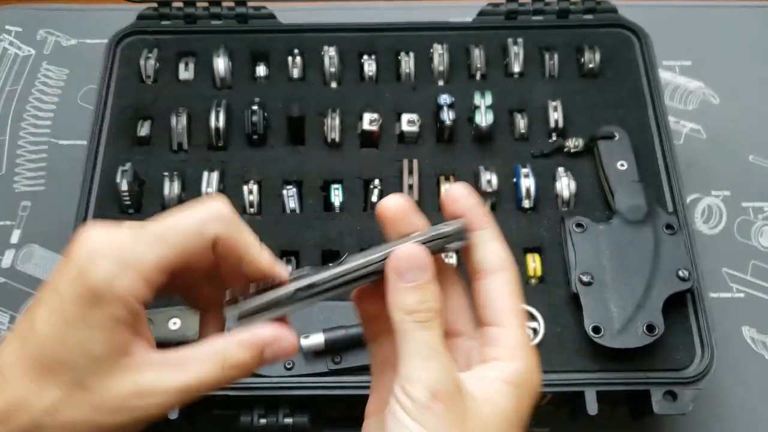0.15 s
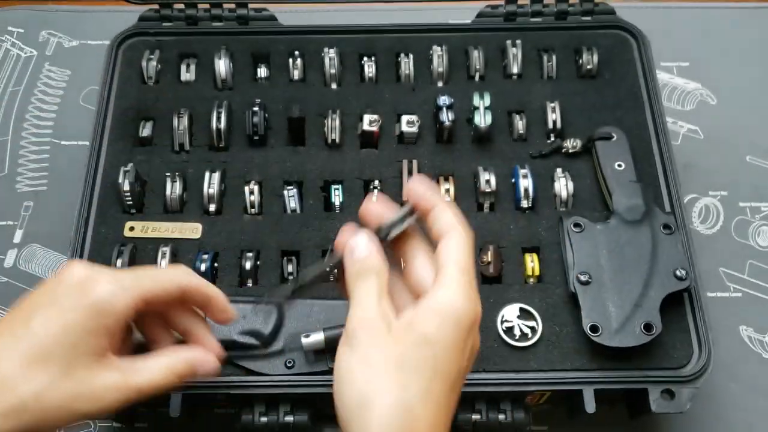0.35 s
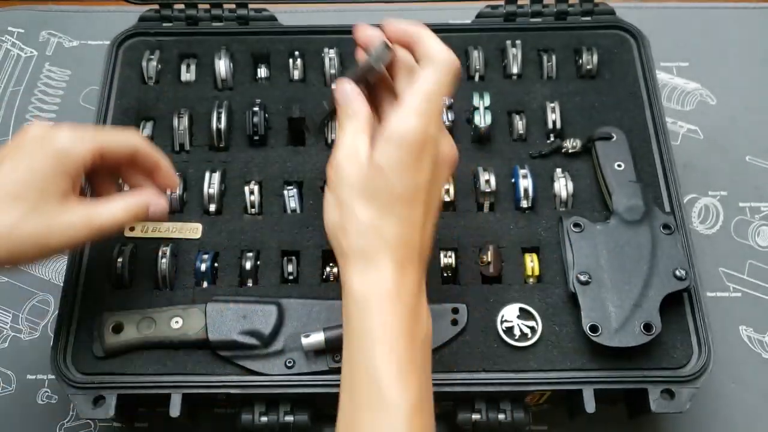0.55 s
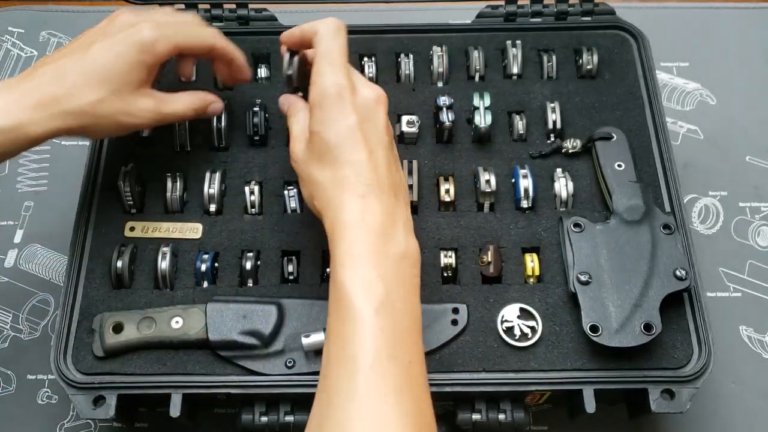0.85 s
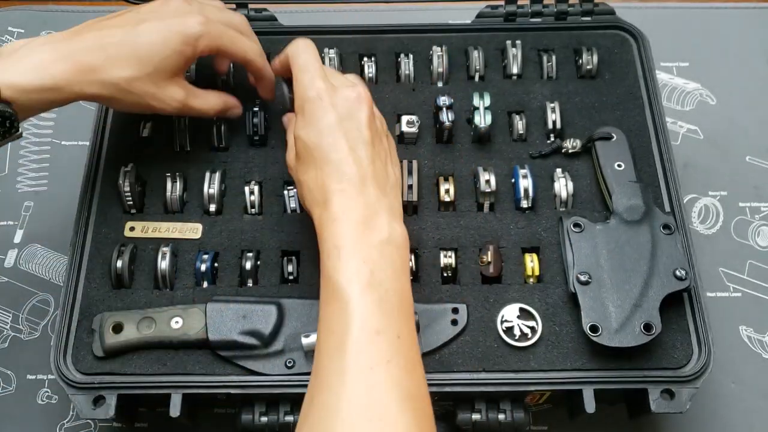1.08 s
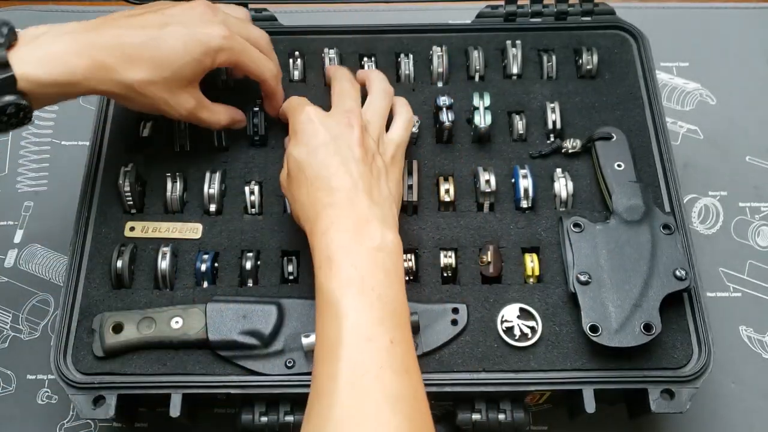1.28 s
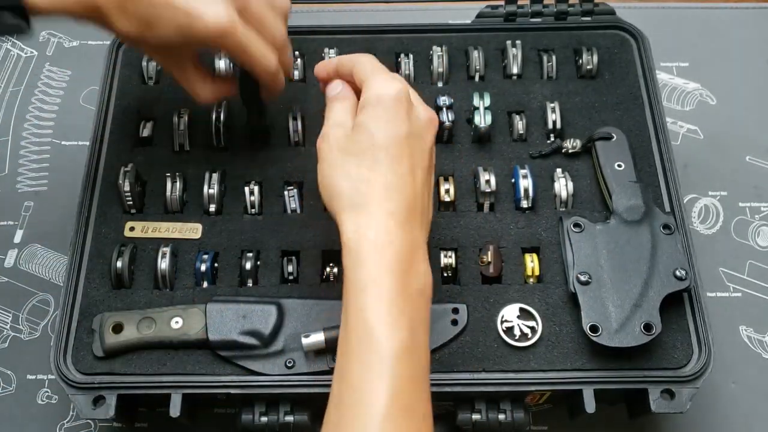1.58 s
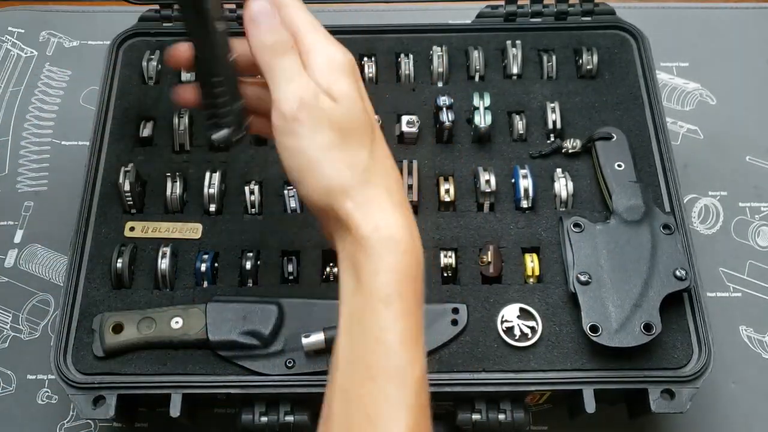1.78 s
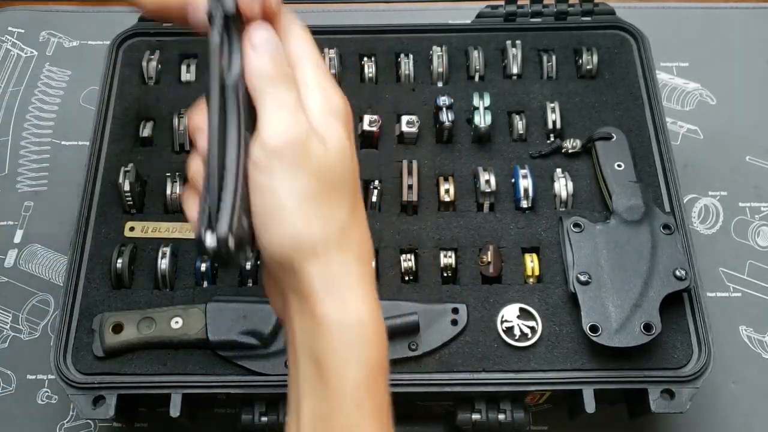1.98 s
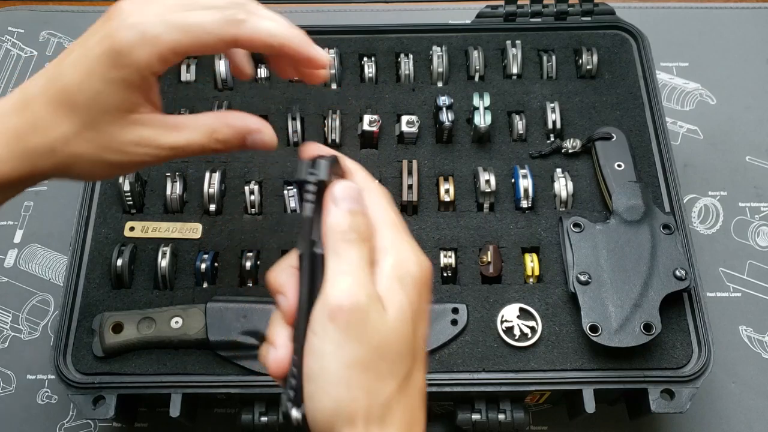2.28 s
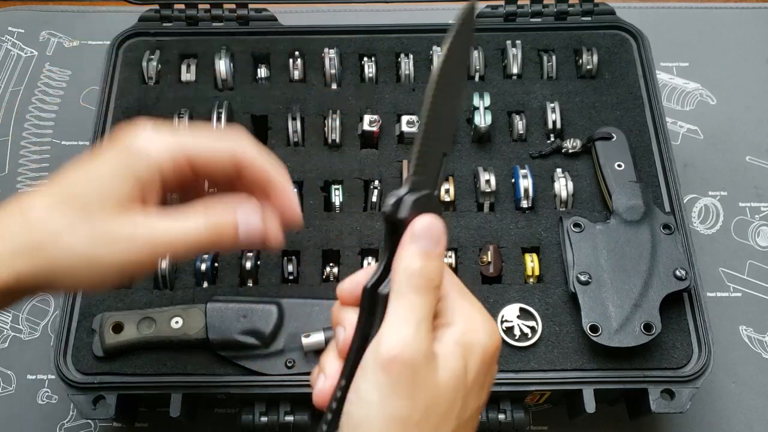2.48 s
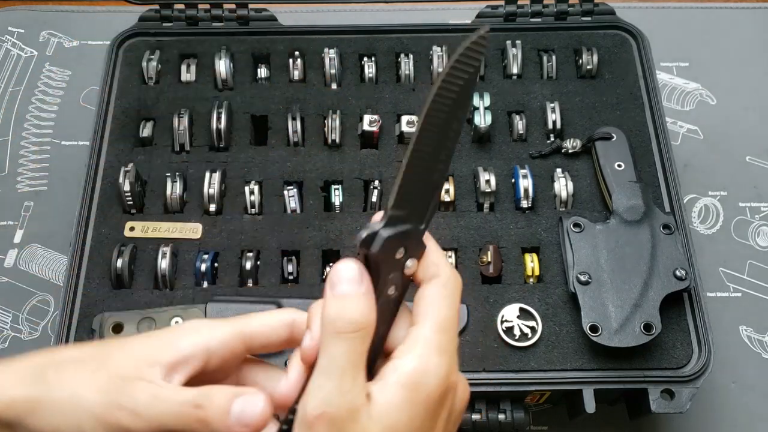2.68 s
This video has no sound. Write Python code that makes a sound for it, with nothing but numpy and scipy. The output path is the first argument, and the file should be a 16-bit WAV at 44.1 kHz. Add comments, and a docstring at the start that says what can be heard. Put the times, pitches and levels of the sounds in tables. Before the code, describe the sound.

Soft foam rustles and dull thumps, then a pocket knife flicks open with a hard steel snap

```python
"""In a quiet, small room, knives are moved in a foam-lined case close to two microphones.
One slides into the foam and thumps the case; another is drawn out, ticks, and its blade snaps open.
Steel is decaying modes under noise cracks, foam is random slips through resonances, rubbing is shaped noise.
A low hum wavers under the hiss of the microphones; the left one hisses in the mid band."""
import sys
import numpy as np
from scipy import signal
from scipy.fft import rfft, irfft
from scipy.io import wavfile
from scipy.ndimage import uniform_filter1d

SR = 44100
rng = np.random.default_rng(int(sys.argv[2]) if len(sys.argv) > 2 else 0)


def dump(signal):
    """Clip the signal to [-1, 1] and save it as 16-bit WAV at the path in sys.argv[1]."""
    limited = np.clip(np.atleast_2d(signal).T, -1, 1)
    pcm = np.round(limited * 32767).astype(np.int16)
    wavfile.write(sys.argv[1], SR, pcm)


N = 125685  # length in samples


def amp(db):
    """Decibel definition: amplitude ratio of a level."""
    return 10 ** (np.asarray(db) / 20)


def evened(x):
    """Normalisation: scales each channel to an RMS of 1."""
    return x / np.sqrt(np.mean(x ** 2, axis=-1, keepdims=True) + 1e-20)


def read(points, hz):
    """Logarithmic frequency scale: interpolates the columns of a table along it."""
    f, *cols = np.transpose(points)
    return np.array([np.interp(np.log(hz + 1), np.log(f + 1), c) for c in cols])


def level(rows, column=1):
    """Amplitude envelope: gain over time from a dB column, silent outside the table."""
    rows = np.array(rows)
    return amp(np.interp(np.arange(N) / SR, rows[:, 0], rows[:, column], left=-200, right=-200))


def add(mix, s, sound):
    """Superposition: adds a sound into the mix from time s."""
    part = mix[..., round(s * SR):][..., :sound.shape[-1]]
    part += sound[..., :part.shape[-1]]


def colour(x, points):
    """Linear filtering: multiplies the spectrum by a dB table."""
    gain = amp(read(points, np.fft.rfftfreq(x.shape[-1], 1 / SR)))
    return irfft(rfft(x) * gain, x.shape[-1])


def resonate(x, hz, width):
    """Resonance: shifts a fixed or moving centre to 0 Hz, smooths there and shifts back."""
    turn = np.exp(2j * np.pi * np.cumsum(hz * np.ones(len(x))) / SR)
    r = np.exp(-np.pi * width / SR)
    return 2 * (turn * signal.lfilter([1 - r], [1, -r], x / turn)).real


def resonate_twice(x, hz, width):
    """Cascaded resonance: two equal stages, evened, give steeper skirts."""
    return evened(resonate(resonate(x, hz, width), hz, width))


# blows of steel on steel: (time [s], starting level of the crack [dB], drive of the ring [dB])
STEEL_BLOWS = [(1.479, -51, -44.5), (1.4812, -47.5, -47), (1.4838, -59, -63), (2.252, -71, -64),
               (2.3859, -54.5, -52.5), (2.394, -62.5, -60), (2.4062, -46.5, -56.5), (2.4105, -60.5, -51.5),
               (2.4655, -8, -1.5), (2.4667, -10, -10), (2.4690, -13.5, -13), (2.4778, -24, -23.5)]
# modes of the knife: (frequency [Hz], relative level [dB], decay time t60 [s])
KNIFE_MODES = [(320, -34.5, 0.027), (545, -27, 0.048), (732, -26, 0.058), (1064, -29.5, 0.063),
               (1970, -25.5, 0.027), (2091, -14, .04), (2195, -18, .025), (3767, -15.5, 0.0077),
               (4630, -14.5, .006), (5880, 2.5, .006), (7110, -1, 0.011), (8930, -5, 0.018),
               (13700, -4, 0.0091), (15380, -9, 0.0045)]
# spectrum of the crack before evening: (frequency [Hz], relative level [dB])
CRACK_SPECTRUM = [(300, -18), (1400, -22), (2200, -7.5), (3200, -13.5), (5000, -3.5), (6500, 2.5),
                  (7900, -1), (9200, -3), (13000, -3.5), (16000, -8.5)]
CONTACT_S, CRACK_T60_S = .0002, 0.0078
GRIT_SAME = .6  # correlation of the crack between the microphones
RING_SEND_DB = -8  # the room hears less of the ring than of the crack
CRACK_ECHO_DB = 13  # energy of a crack as the walls receive it, relative to its level


def knife():
    """Modal impact: a ragged crack and decaying modes; returns direct sound and three feeds for the room."""
    t, direct, feeds = np.arange(4000) / SR, np.zeros((2, N)), np.zeros((3, N))
    grits = evened(colour(rng.standard_normal((len(STEEL_BLOWS), 2, 4000)), CRACK_SPECTRUM))
    grits = np.array([[1, 0], [GRIT_SAME, np.sqrt(1 - GRIT_SAME ** 2)]]) @ grits
    click = colour(np.eye(1, 200, 20)[0], CRACK_SPECTRUM)[0]
    click = click / np.linalg.norm(click)
    contact = 1 - np.exp(-t / CONTACT_S)
    for k, (s, crack_db, ring_db) in enumerate(STEEL_BLOWS):
        ring = np.zeros(len(t))
        for hz, mode_db, t60 in KNIFE_MODES:
            ring += amp(mode_db - 60 * t / t60) * np.sin(2 * np.pi * (hz * t + rng.random()))
        ring *= .5 * amp(ring_db) * contact
        crack = amp(crack_db - 60 * t / CRACK_T60_S) * grits[k] * contact
        add(direct, s, ring + crack)
        # successive blows take turns among the feeds
        add(feeds[k % 3], s, amp(RING_SEND_DB) * ring)
        add(feeds[k % 3], s, amp(crack_db + CRACK_ECHO_DB) * click)
    return direct, feeds


# colour of the direct path to each microphone: (frequency [Hz], left gain [dB], right gain [dB])
DIRECT_COLOUR = [(300, -8, -1), (1000, -10, -11.5), (2100, 2.5, -11.5), (3300, 1, -1), (4400, 1, 3.5),
                 (6690, -7, 5), (7870, 4, 4.5), (9350, 4, 3.5), (11000, -7, 3.5), (15320, 0.5, 0.5)]
RIGHT_LAG_S = .00007


def direct_path(steel):
    """Time-of-arrival difference: the right channel arrives later, and each path has its own colour."""
    lag = np.exp(-2j * np.pi * np.fft.rfftfreq(N, 1 / SR) * RIGHT_LAG_S)
    late = irfft(rfft(steel[1]) * lag, N)
    return colour(np.array([steel[0], late]), DIRECT_COLOUR)


# jolts of the case as the knife lands:
# (time [s], envelope peak level [dB], frequency [Hz], time to the envelope peak [s])
CASE_THUMPS = [(1.2485, -35, 86, 0.0093), (1.279, -44.5, 70, 0.0087), (1.313, -42, 87.7, 0.0115)]
# single catches of the foam:
# (time [s], envelope peak level [dB], frequency [Hz], time to the envelope peak [s])
FOAM_CATCHES = [(.972, -50, 288, 0.0087), (1.2008, -46.5, 380.5, 0.0036), (1.203, -61, 767, 0.0034),
                (1.228, -51, 404, 0.0054), (1.28, -53, 246, .004), (1.587, -52.5, 356, 0.0035),
                (1.601, -52.5, 296, 0.0092), (1.654, -45.5, 320, 0.0035), (1.673, -44.5, 304, 0.0039)]
# low jolt of the snap; levels are (left, right)
PUSH_S, PUSH_HZ, PUSH_SWELL_S, PUSH_DB = 2.4655, 72, 0.003, [-52, -33]


def thumps():
    """Transient excitation: the case booms, the foam catches, and the snap jolts the microphones."""
    out = np.zeros((2, N))
    for s, db, hz, swell in CASE_THUMPS + FOAM_CATCHES:
        add(out, s, bump(db, hz, swell))
    add(out, PUSH_S, bump(np.c_[PUSH_DB], PUSH_HZ, PUSH_SWELL_S))
    return out


def bump(db, hz, swell):
    """Critically damped envelope: a low sine swells and dies."""
    t = np.arange(8000) / SR
    return amp(db) * np.sin(2 * np.pi * hz * t) * t / swell * np.exp(1 - t / swell)


# strokes against the foam, one list each:
# (time [s], level of the low creak [dB], level of the hiss before pickup [dB], pitch of the creak [Hz])
FOAM_STROKES = [
    [(0.76, -96, -94, 335), (0.774, -100, -86, 363), (0.784, -93, -96, 396), (0.804, -81, -96, 383),
     (0.866, -80, -95, 330), (0.904, -88, -94, 314), (0.944, -82, -87, 305), (0.978, -61.5, -72.5, 313),
     (1.024, -64.5, -69, 335), (1.078, -81, -84, 325), (1.1, -84, -79, 376)],
    [(1.1, -90, -76.5, 363), (1.158, -63, -66, 387), (1.184, -70, -63.5, 400), (1.202, -60, -65, 395),
     (1.24, -54.5, -65, 390), (1.27, -67, -74, 326), (1.286, -63.5, -75.5, 304), (1.36, -77.5, -106, 310)],
    [(1.49, -101, -64, 354), (1.512, -65, -70, 316), (1.564, -63.5, -62.5, 358), (1.584, -52.5, -63, 320),
     (1.622, -52.5, -58, 363), (1.664, -54, -59.5, 332), (1.686, -54.5, -68.5, 321),
     (1.704, -70.5, -73, 320), (1.76, -84, -87, 328)],
]
# resonances of the creak: (multiple of the creak pitch, width [Hz], relative level [dB])
FOAM_RESONANCES = [(0.752, 102, -3.5), (1.05, 112, 2), (1.45, 139, -9), (2.201, 260, -18), (3, 306, -20)]
SLIPS_PER_S, SLIP_SPREAD_DB = 1100, 2.5
CREAK_SIDE_DB = -13  # stereo difference relative to the common part


def foam_creak():
    """Stick-slip friction: random uneven slips excite resonances that follow the creak pitch."""
    happens = rng.random((2, N)) < SLIPS_PER_S / SR
    strength = amp(SLIP_SPREAD_DB * rng.exponential(1, (2, N)))
    slips = rng.standard_normal((2, N)) * strength * happens
    rows = np.concatenate(FOAM_STROKES)
    pitch = np.interp(np.arange(N) / SR, rows[:, 0], rows[:, 3])

    def voice(x):
        """Parallel resonances: sums the evened bands."""
        return evened(sum(amp(db) * resonate_twice(x, k * pitch, w) for k, w, db in FOAM_RESONANCES))

    mid, side = voice(slips[0]), voice(slips[1])
    creak = mid + amp(CREAK_SIDE_DB) * side * np.c_[[1, -1]]
    return creak * sum(level(stroke) for stroke in FOAM_STROKES)


# spectrum of rubbing noise before evening: (frequency [Hz], relative level [dB])
RUB_SPECTRUM = [(600, 6.5), (1500, 9), (3000, -1.5), (5000, -4), (7000, 0.5), (9000, 1), (12500, 0.5),
                (16000, -2.5)]
# scrape of the pivot: (time [s], level before pickup [dB])
PIVOT_SWING = [(2.383, -69), (2.392, -68), (2.402, -76), (2.41, -61), (2.425, -72), (2.445, -76),
               (2.461, -67), (2.4655, -36.5)]
# extra colour of the pivot over rubbing noise, before evening: (frequency [Hz], relative gain [dB])
PIVOT_COLOUR = [(1500, -14.5), (4000, -5), (5200, -2), (6500, -8), (9300, 2.5), (11000, -2.5),
                (15500, -2.5)]


def rubbing_hiss():
    """Friction noise: surfaces hiss under each stroke, and the pivot scrapes in a colour of its own."""
    noise = evened(colour(rng.standard_normal((2, N)), RUB_SPECTRUM))
    strokes = noise * sum(level(stroke, column=2) for stroke in FOAM_STROKES)
    pivot = evened(colour(noise, PIVOT_COLOUR)) * level(PIVOT_SWING)
    return strokes + pivot


SQUEAK_S, SQUEAK_LONG_S, SQUEAK_HZ, SQUEAK_WIDE_HZ, SQUEAK_DB = .18, 0.066, 8400, 300, -77


def squeak():
    """Narrow-band noise: a faint thin whistle swells and stops."""
    out, u = np.zeros((2, N)), np.arange(0, 1, 1 / SR / SQUEAK_LONG_S)
    noise = rng.standard_normal((2, 4000))
    thin = np.array([resonate_twice(v, SQUEAK_HZ, SQUEAK_WIDE_HZ) for v in noise])
    add(out, SQUEAK_S, amp(SQUEAK_DB) * thin[:, :len(u)] * np.sin(np.pi * u ** 2))
    return out


# reverberation of the room: (frequency [Hz], decay time t60 [s])
ROOM_DECAY = [(300, 0.2), (1500, .2), (3000, .22), (5000, 0.24), (7000, 0.23), (8500, 0.21), (12000, 0.197),
              (16000, 0.2)]
ROOM_DB, ROOM_GAP_S = -1, .003  # reverberant gain; time scale of its onset


def room(x):
    """Reverberant decay: sparse taps of random sign, each band dying at its own speed."""
    taps = np.zeros((2, SR // 2))
    at = np.arange(0, SR // 2 - 10, 10)
    at = at + rng.integers(0, 10, (2, len(at)))
    np.put_along_axis(taps, at, rng.choice([-1., 1.], at.shape), 1)
    hz, t, z = signal.stft(taps, SR, nperseg=256)
    decay = amp(-60 * t / read(ROOM_DECAY, hz).T)
    tail = signal.istft(z * decay, SR, nperseg=256)[1]
    tail *= 1 - np.exp(-(np.arange(tail.shape[1]) / SR / ROOM_GAP_S) ** 2)
    tail /= np.linalg.norm(tail[0])
    return amp(ROOM_DB) * signal.fftconvolve(x[None], tail, axes=1)[:, :N]


# colour of each microphone for diffuse sound: (frequency [Hz], left gain [dB], right gain [dB])
DIFFUSE_COLOUR = [(300, -1, -1), (1010, -2, -4.5), (2170, 1.5, -0.5), (3326, 1, 0.5), (5000, 1, 5),
                  (6570, -2, -1), (7300, -2, 0.5), (8060, -1, -7), (8760, -0.5, 0.5), (9400, 0, 1),
                  (12560, -4, 5), (15500, -2.5, 2)]


def diffuse_pickup(x):
    """Diffuse-field response: each microphone colours the reverberation and the rubbing hiss."""
    return colour(x, DIFFUSE_COLOUR)


# wavering of the hum: (time [s], level of the tone before panning [dB])
HUM_LEVEL = [(0.0, -60), (0.1, -74), (0.21, -62.5), (0.29, -92), (0.48, -63.5), (0.55, -78.5),
             (0.67, -63.5), (0.79, -70.5), (0.92, -59.5), (0.97, -74), (1.09, -62), (1.17, -91),
             (1.27, -50), (1.41, -64.5), (1.57, -60.5), (1.65, -67), (1.75, -60.5), (1.86, -66),
             (1.98, -60.5), (2.11, -86.5), (2.19, -70.5), (2.34, -75.5), (2.48, -58.5), (2.55, -69.5),
             (2.64, -63), (2.85, -69)]
HUM_HZ, HUM_WANDER_HZ, HUM_PAN_DB = 59.3, 3, 2  # pitch, RMS of its wander, left over right
RUMBLE_DB, RUMBLE_HZ, RUMBLE_WIDE_HZ = -11, 105, 68.5  # rough bass, level relative to the tone


def hum():
    """Frequency and amplitude modulation: a wandering low tone, with rough bass swelling alongside."""
    wander = evened(uniform_filter1d(uniform_filter1d(rng.standard_normal(N), size=4000), size=4000))
    tone = np.sqrt(2) * np.sin(2 * np.pi * np.cumsum(HUM_HZ + HUM_WANDER_HZ * wander) / SR)
    noise = rng.standard_normal((2, N))
    rough = np.array([resonate_twice(v, RUMBLE_HZ, RUMBLE_WIDE_HZ) for v in noise])
    pan = amp([[HUM_PAN_DB / 2], [-HUM_PAN_DB / 2]])
    return (tone + amp(RUMBLE_DB) * rough) * level(HUM_LEVEL) * pan


# hiss of the microphones, left before its flicker:
# (frequency [Hz], left density [dB per Hz], right density [dB per Hz])
MICROPHONE_HISS = [(24.83, -106, -106), (90, -104, -106), (200, -109, -112), (370, -110, -113),
                   (1025, -113, -117), (1268, -92.5, -116), (2464, -94.5, -119), (2826, -109, -119),
                   (4080, -111, -119), (4220, -120, -121), (6300, -122, -128), (7800, -128, -131),
                   (8300, -119, -131), (10800, -119, -126), (13400, -118, -118), (14200, -114, -116),
                   (16200, -121, -120)]
FLICKER_DB, BASS_SAME_HZ = 1, 150  # RMS flicker; frequency scale over which likeness fades


def microphone_hiss():
    """Partial coherence: hiss is shared in the bass and separate above; the left flickers slightly."""
    a, b, fast = rng.standard_normal((3, N))
    same = np.exp(-np.fft.rfftfreq(N, 1 / SR) / BASS_SAME_HZ)
    right = irfft(same * rfft(a) + np.sqrt(1 - same ** 2) * rfft(b), N)
    flicker = evened(uniform_filter1d(uniform_filter1d(fast, size=300), size=300))
    left = a * amp(FLICKER_DB * flicker)
    return colour(np.array([left, right]), MICROPHONE_HISS) * np.sqrt(SR / 2)  # to density per Hz


def scene():
    """Superposition: direct steel, diffuse sound, foam, thumps and background add at the microphones."""
    steel, feeds = knife()
    diffuse = diffuse_pickup(sum(room(feed) for feed in feeds) + rubbing_hiss())
    near = direct_path(steel) + thumps() + foam_creak() + squeak()
    return near + diffuse + hum() + microphone_hiss()


DIP_FROM_DB, DIP_BACK_DB_PER_S = -33.5, 38.5  # threshold; fall of the held level
DIP_SHARE = 0.15  # dB of dip per dB over the threshold
CEILING, EDGE_HZ = .95, 15900  # overload ceiling; upper band limit


def record(dry):
    """Level: everything is slightly quieter for a moment after the snap; then soft overload and the band limit."""
    power = signal.lfilter([.005], [1, -.995], (dry ** 2).mean(0))
    power_db = 10 * np.log10(power + 1e-12)
    fall = np.arange(N) * DIP_BACK_DB_PER_S / SR
    held_db = np.maximum.accumulate(power_db + fall) - fall  # peaks held, then falling steadily
    over_db = np.maximum(held_db - DIP_FROM_DB, 0)
    dipped = dry / amp(DIP_SHARE * signal.lfilter([.002], [1, -.998], over_db))
    soft = CEILING * np.tanh(dipped / CEILING)
    low_pass = signal.firwin(511, EDGE_HZ, window=("kaiser", 9), fs=SR)
    return signal.oaconvolve(soft, low_pass[None], "same")


dry = scene()
out = record(dry)
dump(out)
```